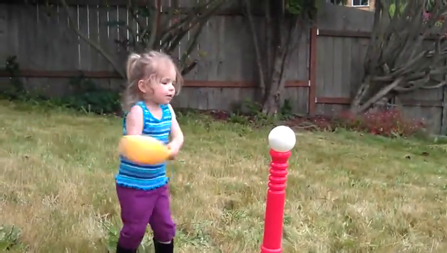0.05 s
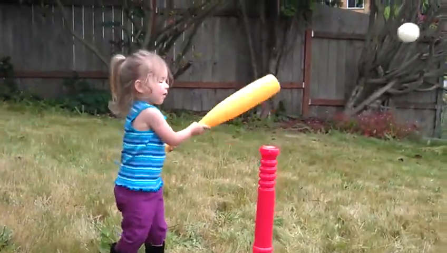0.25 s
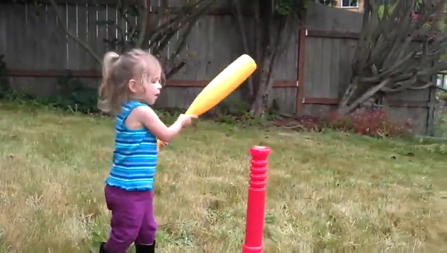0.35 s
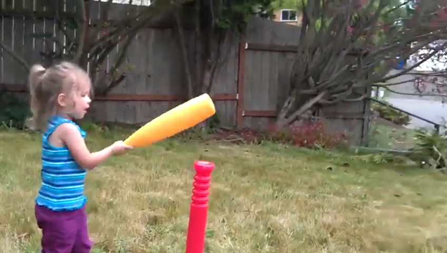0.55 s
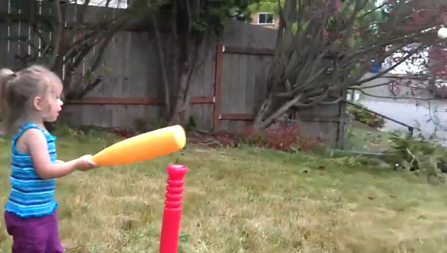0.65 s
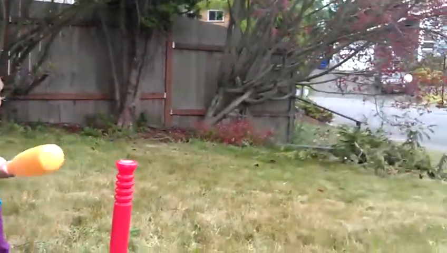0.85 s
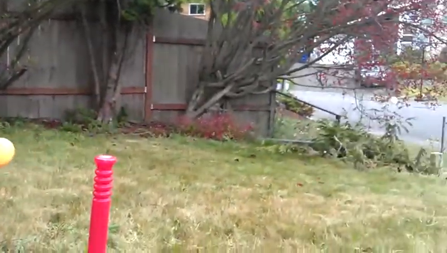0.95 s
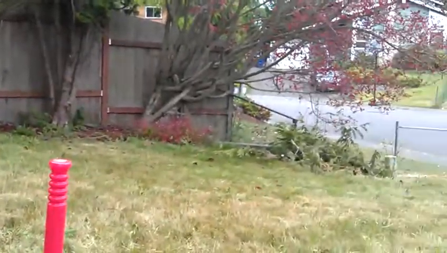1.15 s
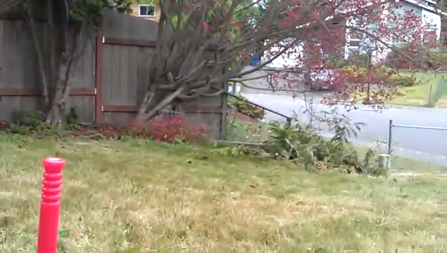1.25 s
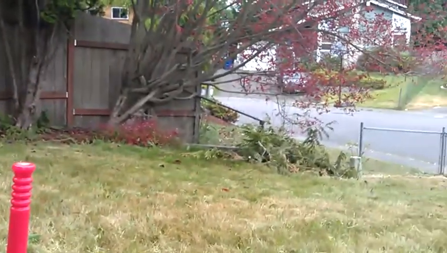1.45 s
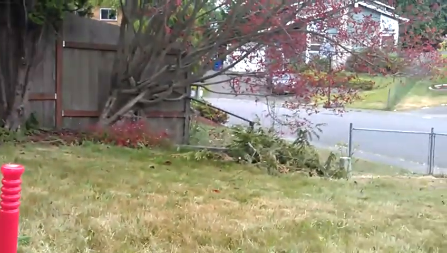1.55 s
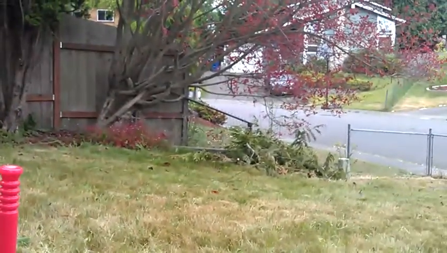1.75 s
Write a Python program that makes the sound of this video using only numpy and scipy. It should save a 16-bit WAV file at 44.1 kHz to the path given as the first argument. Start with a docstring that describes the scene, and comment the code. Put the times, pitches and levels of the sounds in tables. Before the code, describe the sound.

A hollow plastic bat cracks a plastic ball off a tee close to the microphone, echoing briefly around a back yard. The ball lands with three light taps further off, amid faint rustles, thin bird notes and distant traffic.

```python
"""Distant traffic hums behind a back yard. A swing hisses softly, then a hollow plastic bat cracks
a plastic ball off a tee, close by. Bat and tee ring briefly while the fence and far houses throw
the crack back. A faint rustle and a thin bird note follow, the ball lands and taps three times
further off, and a second bird note, a last small click and more rustling close the scene."""
import sys
import numpy as np
from scipy import signal
from scipy.fft import irfft
from scipy.io import wavfile

SR = 44100
rng = np.random.default_rng(int(sys.argv[2]) if len(sys.argv) > 2 else 0)


def transcribe(u):
    """Save the signal u as a 16-bit wav file named by the first command-line argument.

    u: samples, shape (n,) or (channels, n), limited to [-1, 1]; the rate is SR.
    q: integer samples, one column per channel.
    """
    v = np.clip(np.atleast_2d(u).T, -1, 1)
    q = np.round(v * 32767).astype(np.int16)
    wavfile.write(sys.argv[1], SR, q)


N = 79380
HIT_S = .2075


def undb(db):
    """Decibels to gain."""
    return 10 ** (np.asarray(db) / 20)


def since(start):
    """Seconds since start, zero before it."""
    return np.maximum(np.arange(N) / SR - start, 0)


def fader(points):
    """Gain ridden through points of time_s, level_db."""
    return undb(np.interp(since(0), *np.array(points).T))


def over_hz(points):
    """Points of freq_hz, value, joined on a log-frequency axis."""
    hz, value = np.array(points, float).T
    return np.interp(np.log(np.fft.rfftfreq(N, 1 / SR) + 1), np.log(hz), value)


def envelope(start, rise, hold, t60):
    """Linear attack, hold and exponential release, all in seconds."""
    attack = np.minimum(since(start) / max(rise, 1 / SR), 1)
    return attack * np.exp(-np.log(1000) * since(start + rise + hold) / t60)


def resonance(hz, width):
    """Gain of one resonance over frequency."""
    f = np.fft.rfftfreq(N, 1 / SR) + 1
    return np.abs(1 / (1 + 1j * (f - hz * hz / f) / width))


def stereo_phase(hz):
    """Left and right phase offsets that widen a tone, 0.3 radians apart per kHz."""
    return np.array([[.5], [-.5]]) * .3 * hz / 1e3


# Stereo image, narrow bass and wide treble: freq_hz, channel_correlation
STEREO_IMAGE = [(100, 0.99), (750, 0.86), (1200, 0.26), (2500, .25), (6000, 0.18), (13000, .2)]
def noise(gain, pan=None):
    """Stereo noise of unit level, shaped by a gain spectrum and an optional pan curve."""
    mid, side = np.exp(2j * np.pi * rng.random((2, N // 2 + 1)))
    alike = np.clip(over_hz(STEREO_IMAGE), -1, 1)
    sides = np.array([[1], [-1]])
    spectrum = gain * (mid * np.sqrt(1 + alike) + sides * side * np.sqrt(1 - alike))
    balance = undb(sides * over_hz(pan) / 2) if pan else 1
    y = irfft(spectrum * balance, N)
    return y / y.std()


def coloured(eq, pan=None, peaks=()):
    """Unit-level noise through an EQ curve; peaks add the resonances of a plastic shell."""
    db = over_hz(eq)
    if peaks:
        # The countless small shell modes differ in strength: a random 3.5 dB ripple.
        grid_hz = np.arange(2048) * 45.07
        db = db + 3.5 * np.interp(np.fft.rfftfreq(N, 1 / SR), grid_hz, rng.standard_normal(2048))
        db = db + sum(lift_db * resonance(hz, width) ** 2 for hz, width, lift_db in peaks)
    return noise(undb(db), pan)


def burst(start, hz, width, t60, pan=None):
    """A cluster of fast-dying shell modes around a centre pitch."""
    return noise(resonance(hz, width) ** 2, pan) * envelope(start, .00064, .001, t60)


def knock(start, hz, width, t60, tone_db, pan):
    """One contact: the struck spot rings briefly inside a cluster of fast-dying modes."""
    tone = np.sqrt(2) * np.sin(2 * np.pi * hz * since(start) + stereo_phase(hz))
    tone *= undb(tone_db) * envelope(start, .00046, .001, t60)
    return tone + burst(start, hz, width, t60, pan)


# Tone of the road hum: freq_hz, gain_db
TRAFFIC_EQ = [(30, -33.5), (80, -13.5), (120, -15), (210, -8.5), (300, -11), (420, -13.5), (600, -7.5),
              (870, -2.5), (1250, -13), (1830, -20.5), (2800, -32), (4200, -29.5), (6500, -39.5),
              (9000, -36.5), (12500, -51), (14000, -59)]
# Its slow swell: time_s, level_db
TRAFFIC_FADER = [(0, -55), (.5, -54.5), (.9, -57), (1.1, -54.5), (1.3, -52.5), (1.55, -54.5), (1.8, -55.5)]
def traffic():
    """A bed of distant roads, swelling slowly."""
    return fader(TRAFFIC_FADER) * coloured(TRAFFIC_EQ)


# Far bird notes: start_s, length_s, pitch_hz, level_db
BIRD_NOTES = [(0.997, 0.11, 7880, -77), (1.504, 0.053, 3207, -69.5)]
def birds():
    """Thin, far notes of narrow-band noise that swell and fade."""
    out = 0
    for start, length, hz, db in BIRD_NOTES:
        swell = np.sin(np.pi * np.minimum(since(start) / length, 1))
        out += undb(db) * noise(resonance(hz, width=120) ** 3) * swell
    return out


# Faint rustles: start_s, level_db, rise_s, hold_s, t60_s
RUSTLE_CUES = [(0.77, -68, 0.0077, 0.0052, 0.28), (1.674, -62, 0.019, 0.042, 0.39),
               (1.732, -62.5, 0.015, 0.032, .5)]
# Their papery tone: freq_hz, gain_db
RUSTLE_EQ = [(500, -7.5), (2000, -20.5), (3500, -1), (5000, -5), (7000, -15), (9500, -7), (13000, -27)]
# Placement of the rustles and the bouncing ball: freq_hz, left_minus_right_db
FAR_PAN = [(1000, -3), (2200, 3), (4000, -1.5), (7500, -5.5), (13000, 2)]
def rustles():
    """Something stirs in the garden: soft puffs of bright noise."""
    level = sum(undb(db) * envelope(start, *shape) for start, db, *shape in RUSTLE_CUES)
    return level * coloured(RUSTLE_EQ, FAR_PAN)


# Rise and fall of the swing: time_s, level_db
SWING_FADER = [(0, -67), (.05, -64.5), (.12, -71.5), (.2, -72), (.26, -86.5)]
# Its airy tone: freq_hz, gain_db
SWING_EQ = [(1500, -18.5), (4000, -2.5), (7000, -10), (9500, 4.5), (13000, -16)]
def swing():
    """The soft hiss of the swing, leading into the hit."""
    return fader(SWING_FADER) * coloured(SWING_EQ)


# Clicks, up to three to a bounce: start_s, level_db, pitch_hz, width_hz, t60_s, tone_mix_db
BALL_CLICKS = [(1.1201, -44, 4480, 350, .022, 2), (1.132, -48, 3590, 300, 0.064, -1),
               (1.2035, -43.5, 4200, 700, .035, -20), (1.2103, -41.5, 4540, 700, 0.03, -15),
               (1.2208, -43.5, 4300, 500, 0.064, -8), (1.3191, -45.5, 3100, 1300, .035, -28),
               (1.325, -44, 4300, 1200, .028, -20), (1.693, -60, 2610, 1400, .03, -30)]
# Scatter of each bounce: start_s, level_db, rise_s, hold_s, t60_s, resonance_hz, lift_db
BOUNCE_SCATTER = [(1.115, -47.5, 0.0055, 0.016, 0.15, 3550, -10),
                  (1.201, -47, 0.0072, 0.012, 0.13, 2406, 14.5),
                  (1.317, -44, 0.0051, 0.02, 0.14, 2940, 13.5)]
# Tone of the scatter: freq_hz, gain_db
BOUNCE_EQ = [(100, -5), (400, -31), (1500, -3), (2200, -16), (3000, -5.5), (4400, 2), (5500, -3),
             (7000, -12.5), (8800, -6), (11000, -12), (13500, -36)]
# Resonances of the ball: centre_hz, width_hz, lift_db
BALL_PEAKS = [(2696, 100, 8.5), (3264, 61, 7.5), (3660, 102, 8), (4260, 140, 7.5), (4660, 87, 2.5),
              (5030, 67, 6.5), (5500, 90, 7.5), (5930, 91, 7.5), (8130, 350, 6.5), (8960, 130, 8)]
def ball_taps():
    """The light ball clicks at each bounce; the surroundings scatter the sound into a soft tail."""
    out = sum(undb(db) * knock(start, *voice, FAR_PAN) for start, db, *voice in BALL_CLICKS)
    for start, db, rise, hold, t60, hz, lift_db in BOUNCE_SCATTER:
        tail = undb(-21) * envelope(start, rise=.023, hold=0, t60=1)
        shape = envelope(start, rise, hold, t60) + tail
        peaks = BALL_PEAKS + [(hz, 190, lift_db)]
        out += undb(db) * shape * coloured(BOUNCE_EQ, FAR_PAN, peaks)
    return out


# Slapbacks from fence and houses: start_s, level_db, t60_s, ring_level_db
SLAPBACKS = [(0.2492, -20.5, 0.049, -41), (0.429, -50, 0.19, -45), (0.53, -58.5, 0.056, -68)]
# Tone of the slapbacks: freq_hz, gain_db
SLAPBACK_EQ = [(200, -23.5), (1000, -1), (3000, 2), (4500, 3.5), (7000, -10), (13000, -29)]
# Tone of the open-air tail: freq_hz, gain_db
TAIL_EQ = [(100, -18), (220, 2), (450, -6), (850, 5.5), (1500, -5.5), (3500, -7), (5500, -12.5),
           (7200, -18.5), (9500, -13), (13000, -33.5)]
def yard_echoes():
    """Separate echoes with the plastic colour of the crack, over a thin outdoor tail."""
    level = sum(undb(db) * envelope(start, .0024, .0046, t60) for start, db, t60, _ in SLAPBACKS)
    slaps = level * coloured(SLAPBACK_EQ, peaks=WALL_PEAKS)
    ring = sum(undb(db) * burst(start, hz=2950, width=130, t60=.0396) for start, _, _, db in SLAPBACKS)
    tail = undb(-39.5) * coloured(TAIL_EQ) * envelope(HIT_S, rise=.02, hold=0, t60=.85)
    return slaps + ring + tail


# Ringing modes of the hollow bat and tee: pitch_hz, relative_level_db, t60_s
RING_MODES = [(280.5, -18, 0.16), (344.8, -25, .15), (579.4, -22, 0.14), (640.6, -23, 0.035),
              (741.4, -8, 0.11), (816.8, -13, .075), (935.6, -14, .115), (974, -24, 0.18),
              (1129, -20.5, 0.072), (1468, -24, .11), (1700, -21.5, 0.033), (2443, -32.5, 0.27),
              (3515, -28, 0.073), (3630, -33.5, 0.21), (3925, -27, 0.19), (4230, -27.5, .13),
              (4320, -30.5, 0.22), (4740, -32.5, .15), (9300, -37.5, .13)]
def bat_ring():
    """Air column and wall modes swell after the blow and die away."""
    out = 0
    for hz, db, t60 in RING_MODES:
        phase = 2 * np.pi * (hz * since(HIT_S) + rng.random()) + stereo_phase(hz)
        out += undb(db) * np.sin(phase) * envelope(HIT_S, rise=.015, hold=0, t60=t60)
    return undb(1) * out


# Bright rattle of the thin shells: freq_hz, gain_db
SHELL_EQ = [(150, -46.5), (480, -28), (700, -5.5), (1000, -3), (1200, -10), (1800, -4.5), (2700, -7),
            (4000, -7.5), (5200, -5.5), (7200, -12.5), (9000, -5), (11000, -13.5), (12200, -22.5),
            (13500, -32.5)]
# Resonances of the plastic walls: centre_hz, width_hz, lift_db
WALL_PEAKS = [(1160, 20, 3.5), (1434, 330, 8.5), (1590, 30, 3), (1860, 33, 1.5), (2100, 260, 6.5),
              (2820, 170, 6), (3080, 80, 9), (3550, 110, 14), (3800, 130, 6.5), (4258, 130, 9.5),
              (4540, 70, 3.5), (5020, 61, 0.5), (5750, 250, 7), (6370, 130, 7.5), (8453, 290, 5.5)]
# Placement of the hit: freq_hz, left_minus_right_db
HIT_PAN = [(200, -2), (1000, 3), (1800, 5.5), (4000, -4), (8500, -6.5), (12000, -1)]
# Hollow thump of the body: freq_hz, gain_db
THUMP_EQ = [(40, -40.5), (140, -34.5), (185, -11), (240, -5.5), (340, -1), (420, -10), (510, -27.5),
            (630, 1.5), (900, -0.5), (1200, -17), (2500, -41)]
# Hard contacts within the blow: start_s, level_db, pitch_hz, width_hz, t60_s, tone_mix_db
HIT_CONTACTS = [(0.2072, -14.5, 9000, 2507, .03, -13.5), (0.2079, -13, 3472, 3459, .015, -30.5),
                (0.2092, -12.5, 1757, 703, .017, -2), (0.2138, -12.5, 1092, 695.6, 0.013, -13),
                (0.2215, -15.5, 900, 450, .025, -12), (0.2365, -16.5, 780, 250, 0.015, -3.5)]
def bat_crack():
    """The hit in three layers: rattling plastic walls, a slower body thump and hard contacts on top."""
    shell = coloured(SHELL_EQ, HIT_PAN, WALL_PEAKS) * envelope(HIT_S, rise=.001486, hold=.012, t60=.16)
    thump = coloured(THUMP_EQ) * envelope(HIT_S, rise=.011, hold=.0014, t60=.12)
    contacts = sum(undb(db) * knock(start, *voice, HIT_PAN) for start, db, *voice in HIT_CONTACTS)
    return undb(-13) * shell + undb(-18) * thump + contacts


def scene():
    """The mix: the hit up front, then its echoes, the bounces and the background."""
    hit = bat_ring() + bat_crack()
    return hit + yard_echoes() + ball_taps() + rustles() + swing() + birds() + traffic()


def record(dry):
    """Master chain: round the loudest peaks, thin the bass and cut the top."""
    ceiling, low_cut_hz, high_cut_hz = 1.5, 130, 13700
    rounded = ceiling * np.tanh(dry / ceiling)
    highpass = signal.butter(2, low_cut_hz, "high", fs=SR, output="sos")
    lowpass = signal.ellip(10, .2, 80, high_cut_hz, fs=SR, output="sos")
    return signal.sosfilt(lowpass, signal.sosfilt(highpass, rounded))


dry = scene()
out = record(dry)
transcribe(out)
```